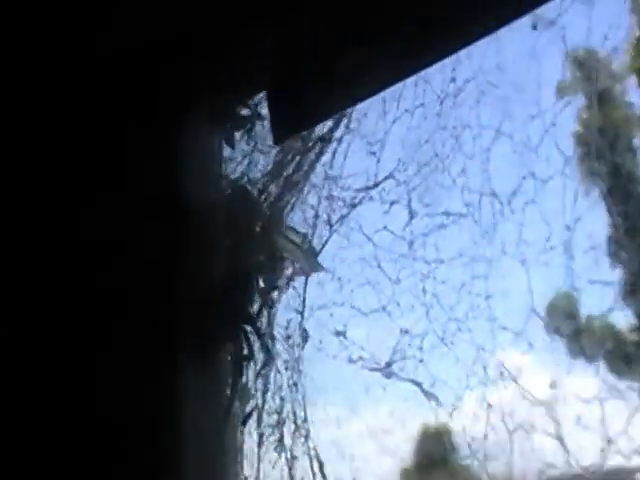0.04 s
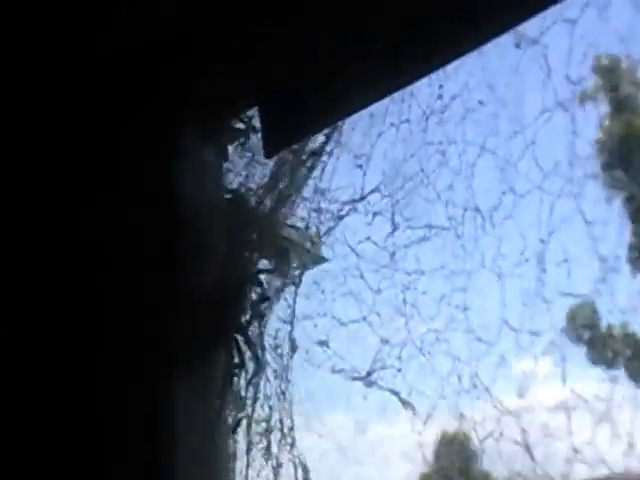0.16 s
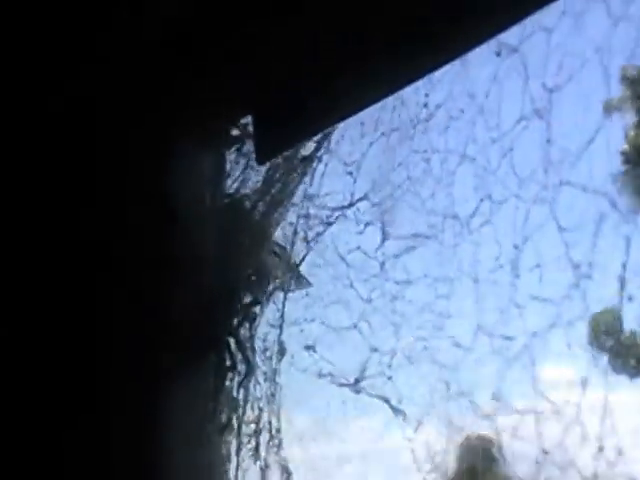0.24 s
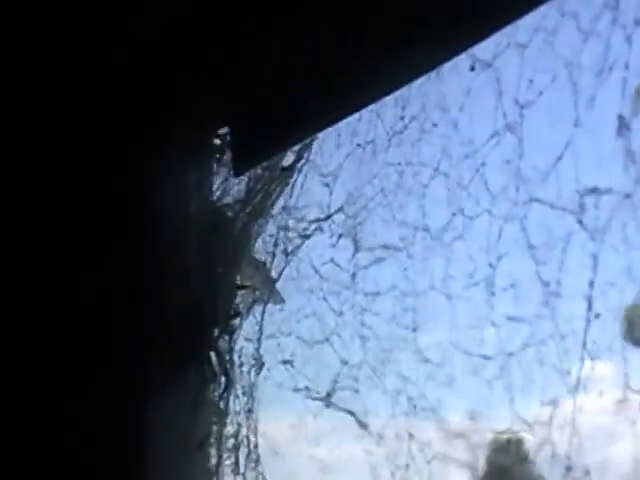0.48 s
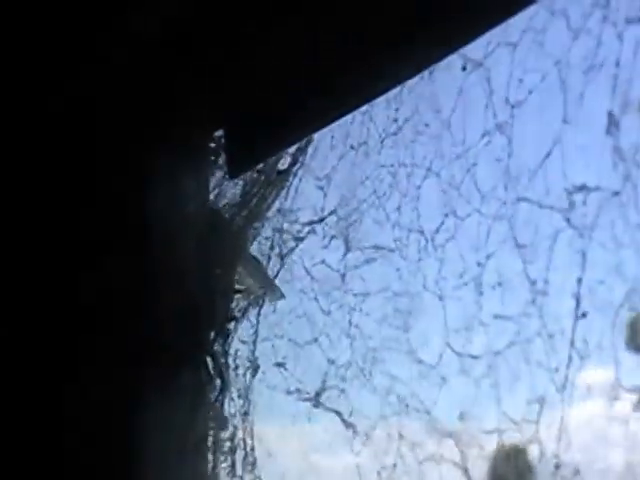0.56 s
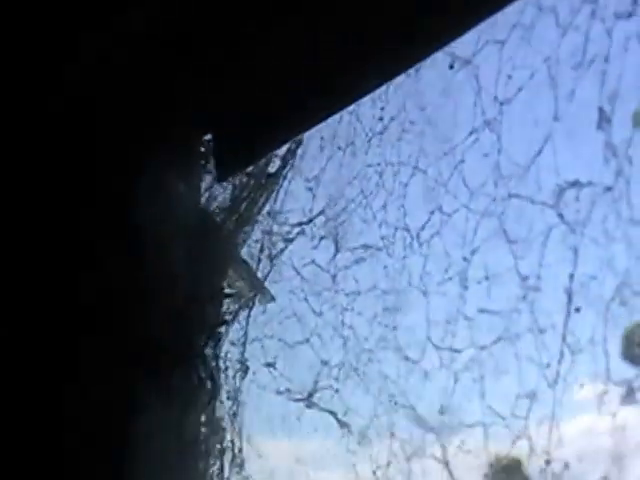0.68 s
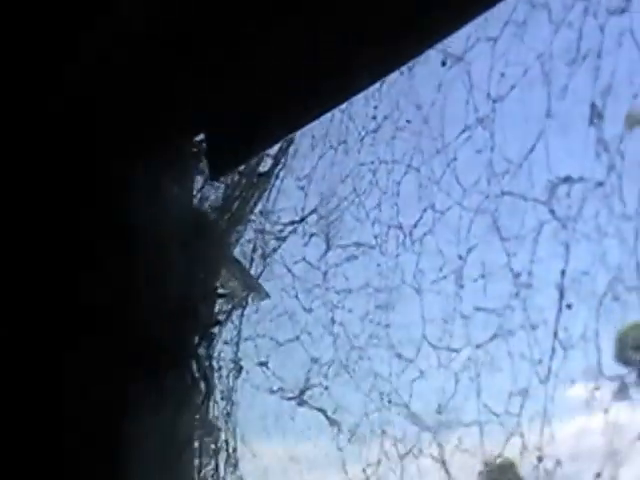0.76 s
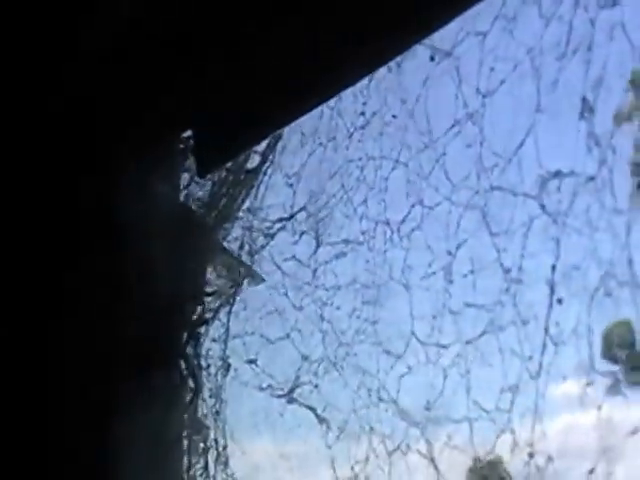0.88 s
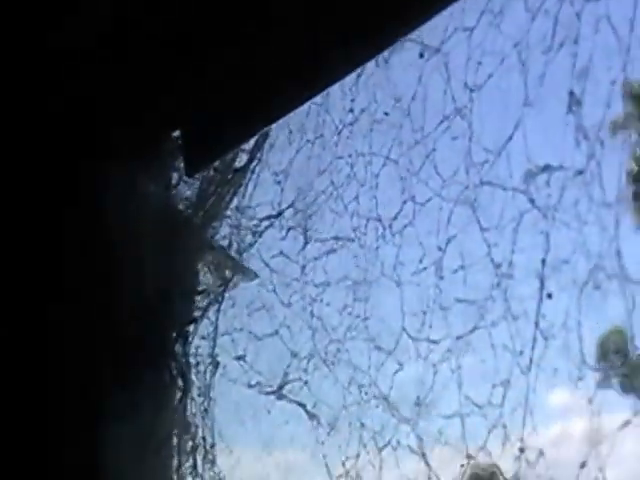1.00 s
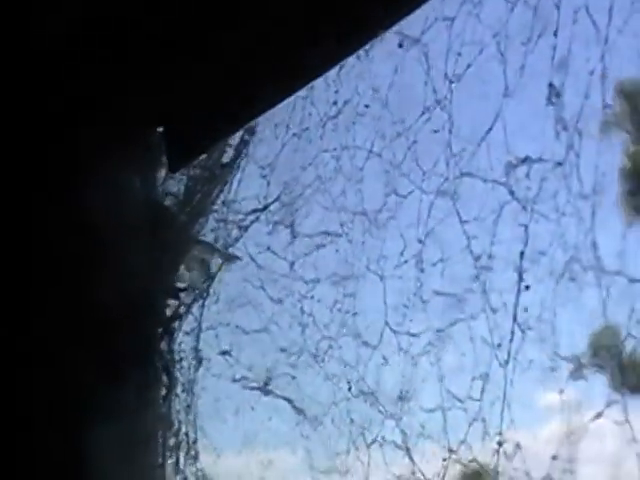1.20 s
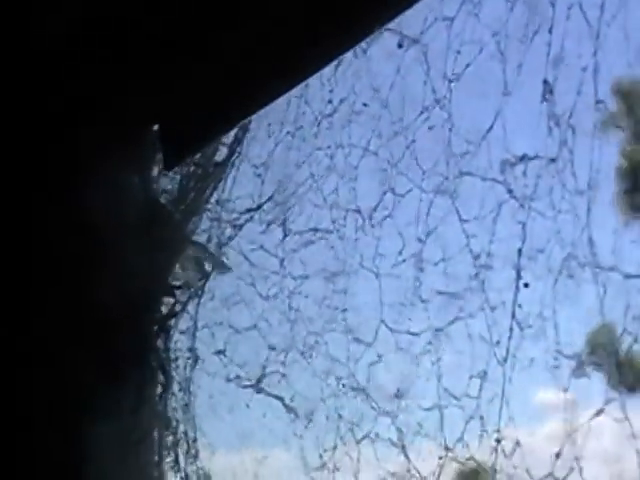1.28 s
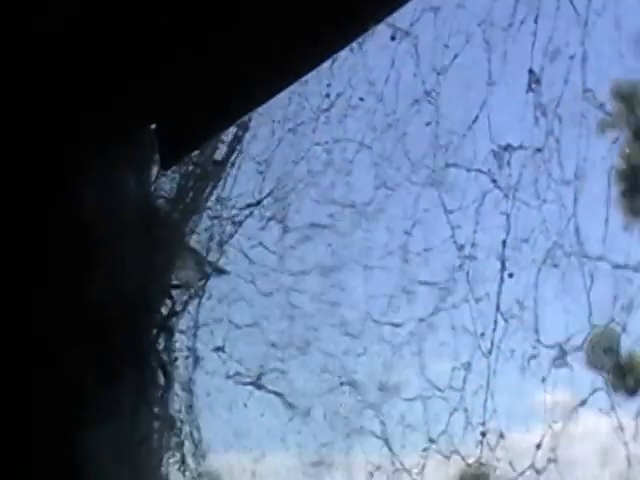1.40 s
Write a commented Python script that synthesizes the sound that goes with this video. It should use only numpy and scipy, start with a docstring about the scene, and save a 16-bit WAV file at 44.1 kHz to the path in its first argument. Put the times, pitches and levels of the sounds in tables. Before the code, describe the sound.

A hand-held camera's plastic casing gives one sharp, thumping click, then a quick cluster and a few lighter clicks, right at the microphone. Faint zoom motor ticking and hum run over low, steady outdoor noise.

```python
"""Handling a zooming camera

A hand-held camera zooms in on a spider web over a quiet outdoor background. Its casing clicks
under the fingers, hard at first, then lightly: each impulse gives a snap and excites damped modes,
heard as a plastic ring and a low thump. A finger slides briefly with friction noise, the zoom motor
ticks faintly in periodic steps, and the camera's drive hums throughout."""
import sys
import numpy as np
from scipy import signal
from scipy.fft import rfft, irfft
from scipy.io import wavfile
from scipy.ndimage import uniform_filter1d

SR = 44100
rng = np.random.default_rng(int(sys.argv[2]) if len(sys.argv) > 2 else 0)


def to_wav(sig):
    """Store sig (one row per channel, or 1-D mono) as 16-bit WAV at the path in sys.argv[1].

    Samples outside -1..1 are clipped; the rate is SR.
    """
    pcm = np.clip(np.atleast_2d(sig), -1, 1) * 32767
    pcm = np.round(pcm).astype(np.int16)
    wavfile.write(sys.argv[1], SR, pcm.T)  # frames by channels


N = 63945

# Casing clicks: start_s, thump_db, ring_db, snap_db, top_mode_boost_db
CASING_CLICKS = [(0.2469, 3.5, -14, -13.5, -6), (.2946, -5, -24.5, -20.5, 5), (.3560, -6, -26, -20, 2),
                 (0.3814, -17.5, -42, -46, 2), (.3893, -35, -35.5, -58, 5), (0.3946, -24, -33, -38, 5),
                 (0.4123, -18.5, -70, -50, 0), (0.4203, -12, -30, -35, 5), (0.4324, -16.5, -29.5, -31.5, 7),
                 (0.4635, -19, -34.5, -42.5, -18), (0.47, -19, -34.5, -51, -2),
                 (0.4985, -10.5, -24, -34.5, 2), (0.6699, -17, -34.5, -42, 3.5),
                 (0.7965, -13, -29.5, -38, 7), (0.9094, -14.5, -28, -39.5, 3.5),
                 (0.9629, -14, -29.5, -40.5, 8), (1.0359, -16, -30, -47, 6), (1.154, -28.5, -70, -63, 0),
                 (1.173, -25, -76, -60, 4)]
# Low modes of the casing: pitch_hz, level_db, t60_s
THUMP_MODES = [(199, 0.5, 0.04), (324.3, 2.5, .016), (561, -9, 0.023)]
# High modes of the casing: pitch_hz, level_db, t60_s
RING_MODES = [(842.5, -15.5, 0.05), (895.3, -15, 0.06), (1142, -17.5, 0.018), (1586, -24, 0.025),
              (1730, -11, 0.017), (2874, -2, .018), (2954, -2, 0.016), (3458, -10.5, 0.015)]
# Spectrum of the snap: frequency_hz, relative_density_db
SNAP_SPECTRUM = [(800, 1.5), (2350, -13.5), (3700, 2), (4300, -2.5), (5200, -3.5), (6100, -9.5), (6600, 1),
                 (7400, -3.5), (8200, 4), (8800, -18), (10000, -24.5), (11000, -14.5), (13000, -20),
                 (16000, -25)]


def casing_clicks(size=2048):
    """Impulse excitation: a snap with a brief rattle sets the casing's high and low modes ringing."""
    body, snaps = np.zeros((2, N))
    t = np.arange(size) / SR
    rattle_envelope = amp(-5) * (np.exp(-t / 0.00064) + amp(-25) * np.exp(-t / 0.011))
    top_hz, top_db, top_t60 = RING_MODES[-1]
    for start_s, thump_db, ring_db, snap_db, boost_db in CASING_CLICKS:
        ring = damped_modes(RING_MODES[:-1] + [(top_hz, top_db + boost_db, top_t60)])
        thump = damped_modes(THUMP_MODES, rise_s=0.011, alternate=True)
        snap = (t == 0) + rattle_envelope * rng.choice([-1., 1.], size)
        add(body, start_s, amp(ring_db) * ring + amp(thump_db) * thump)
        add(snaps, start_s, amp(snap_db) * snap)
    return body + coloured(snaps, SNAP_SPECTRUM)


def damped_modes(modes, rise_s=0.0011, alternate=False, detune=0.0042, size=4096):
    """Modal superposition: each mode of a struck body swells quickly, then decays exponentially."""
    t = np.arange(size) / SR
    hz, db, t60 = np.transpose(modes)[:, :, None]
    hz = hz * (1 + detune * rng.standard_normal(hz.shape))
    # neighbouring bending modes push the microphone in opposite directions
    sign = (-1) ** np.arange(len(modes))[:, None] if alternate else 1
    partials = sign * amp(db - 60 * t / t60) * np.sin(2 * np.pi * hz * t)
    return (1 - np.exp(-t / rise_s)) * partials.sum(0)


# Envelope of the slide: time_s, level_db
SLIDE_ENVELOPE = [(.355, -65), (0.373, -40), (.395, -44.5), (.425, -43), (.44, -58), (.455, -66)]
# Spectrum of the friction: frequency_hz, relative_density_db
SLIDE_SPECTRUM = [(80, 12.5), (200, 7), (450, 1), (700, 5), (860, -30), (1100, -18), (2300, -12.5),
                  (2900, -2.5), (3700, -17), (8300, -15), (9500, -38), (11500, -23), (15000, -31)]


def finger_slide(grain_db=1):
    """Sliding friction: fine slips of skin on plastic merge into grainy noise."""
    grains = rng.standard_normal(N) * amp(grain_db * drift(size=90))
    level_db = np.interp(np.arange(N) / SR, *np.transpose(SLIDE_ENVELOPE), left=-np.inf, right=-np.inf)
    return amp(level_db) * unit(coloured(grains, SLIDE_SPECTRUM))


# Modes rung by a motor step: pitch_hz, level_db, t60_s
STEP_MODES = [(224, -15, 0.017), (560, 3, 0.017), (820, -2.5, 0.026), (2919, 0.5, 0.019),
              (3077, -3.5, 0.016), (3230, -2, 0.0092)]


def zoom_motor(start_s=0.2137, step_s=0.02, strong_db=-46.5, weak_db=-51.5, rebound_db=-3.5):
    """Periodic impacts: steps, weak and strong in turn, tap the lens mount, each with a rebound."""
    taps = np.zeros(N)
    for k, tap_s in enumerate(np.arange(start_s, N / SR, step_s)):
        gain = amp((strong_db if k % 2 else weak_db) + 0.3 * rng.standard_normal())
        add(taps, tap_s, gain * damped_modes(STEP_MODES))
        rebound_s = tap_s + 0.002 * rng.uniform(0.882, 1.2)
        add(taps, rebound_s, gain * amp(rebound_db) * damped_modes(STEP_MODES))
    return taps


# Level difference between the microphone ports: frequency_hz, left_minus_right_db
PORT_LEVELS = [(60, 7), (200, 0), (400, 2.4), (600, -2.5), (860, -8), (1050, 11.5), (1300, 16), (1800, 0),
               (2900, -2.5), (4100, 8.5), (5000, -6.5), (6000, 9.5), (7900, -6.5), (9400, 14), (15000, -7)]
# Phase difference between the ports: frequency_hz, left_lead_rad
PORT_PHASES = [(200, -.06), (330, -.25), (450, -.9), (560, .3), (700, -2.7), (830, -.3), (1200, .6),
               (1450, 0), (2200, .9), (2900, .1), (3450, -.4), (4100, .4), (5000, -.2), (5900, -2.1),
               (7000, -2.6), (8200, -2.5), (9300, .3), (11200, 1.4), (16000, 1.1)]


def microphone_ports(vibration):
    """Structure-borne sound: casing vibration reaches the two ports with unequal level and phase."""
    hz = np.fft.rfftfreq(2 * N, 1 / SR)
    left_response = amp(read(PORT_LEVELS, hz) / 2) * np.exp(.5j * read(PORT_PHASES, hz))
    return irfft(rfft(vibration, 2 * N) * np.array([left_response, 1 / left_response]))[:, :N]


# Tones of the camera's drive: pitch_hz, rms_level_db
HUM_TONES = [(193.8, -65.5), (473.7, -64), (630, -63), (775.2, -71.5), (824, -66.5), (1223, -76)]


def drive_hum(waver=0.28, whine_hz=15625, whine_db=-90):
    """Line spectrum: the drive's tones waver in amplitude and phase under a thin, steady whine."""
    t = np.arange(N) / SR
    tones = amp(whine_db) * np.sin(2 * np.pi * whine_hz * t)
    for hz, db in HUM_TONES:
        envelope = amp(db) * (1 + waver * drift(size=3000))
        phase = 2 * np.pi * (hz * t + rng.random()) + waver * drift(size=3000)
        tones += envelope * np.sin(phase)
    return np.sqrt(2) * tones


# Spectrum of the background: frequency_hz, relative_density_db
AIR_SPECTRUM = [(25, -26), (60, -5), (110, -2), (180, -4), (260, -9), (450, -10), (600, -13), (720, -19),
                (850, -17), (1050, -25), (1200, -23), (1370, -26), (1700, -21), (2120, -26), (2330, -25),
                (2550, -29), (2850, -27), (3600, -35), (5500, -35), (8000, -37), (16000, -43)]
# Likeness of its left and right channels: frequency_hz, coherence_ratio
AIR_COHERENCE = [(60, 0.98), (550, .95), (720, 0.92), (900, 0.56), (1500, 0.78), (2300, 0.29), (2900, 0.99),
                 (4000, 0.19), (8000, 0.069), (10000, 0.38), (16000, 0.4)]


def outdoor_air(level_db=-49, flicker_db=2.38, size=1024):
    """Partial coherence: low, steady noise is nearly mono in the bass and wide in the hiss."""
    hz, hop = np.fft.rfftfreq(size, 1 / SR), size // 4
    noise = rng.standard_normal((5, N // hop + 5, len(hz)))
    left, independent = noise[0] + 1j * noise[1], noise[2] + 1j * noise[3]
    coherence = np.clip(read(AIR_COHERENCE, hz), 0, 1)
    right = coherence * left + np.sqrt(1 - coherence ** 2) * independent
    # the level flickers in small patches of time and frequency
    flicker = unit(uniform_filter1d(uniform_filter1d(noise[4], size=10, axis=0), size=12, axis=1))
    spectra = np.array([left, right]) * amp(read(AIR_SPECTRUM, hz) + flicker_db * flicker)
    _, air = signal.istft(spectra.swapaxes(1, 2), nperseg=size, noverlap=size - hop)
    return amp(level_db) * unit(air[:, :N])


def amp(db):
    """Amplitude ratio of a level in decibels."""
    return 10 ** (np.asarray(db) / 20)


def unit(x):
    """Normalisation to rms 1."""
    return x / np.sqrt(np.mean(x ** 2) + 1e-20)


def read(points, hz):
    """Interpolation on a log-frequency axis."""
    knots_hz, values = np.transpose(points)
    return np.interp(np.log(hz + 1), np.log(knots_hz + 1), values)


def add(mix, start_s, sound):
    """Superposition: a sound joins the mix at its start time."""
    part = mix[max(round(start_s * SR), 0):][:len(sound)]
    part += sound[:len(part)]


def coloured(x, spectrum, size=1024):
    """Spectral shaping by a causal filter of unit energy."""
    hz = abs(np.fft.fftfreq(size, 1 / SR))
    log_gain = np.log(amp(read(spectrum, hz)))
    minimum_phase_response = np.exp(np.conj(signal.hilbert(log_gain)))
    taps = np.fft.ifft(minimum_phase_response).real[:size // 2]
    return signal.fftconvolve(x, taps / np.linalg.norm(taps))[:len(x)]


def drift(size):
    """Smoothed noise: a random wander of rms 1."""
    return unit(uniform_filter1d(uniform_filter1d(rng.standard_normal(N), size), size))


def low_cut(x, hz):
    """Second-order high-pass filtering attenuates the deep bass."""
    return signal.sosfilt(signal.butter(2, hz, "high", fs=SR, output="sos"), x)


def scene():
    """Superposition: the casing's vibration adds to the hum and the outdoor background."""
    vibration = low_cut(casing_clicks() + finger_slide() + zoom_motor(), hz=77.5)
    return microphone_ports(vibration) + drive_hum() + outdoor_air()


def record(dry):
    """Band limiting: the microphone cuts the deep bass and the recorder the highest treble."""
    low_pass = signal.firwin(511, cutoff=15850, window=("kaiser", 9), fs=SR)
    return signal.oaconvolve(low_cut(dry, hz=53.7), low_pass[None], "same")


dry = scene()
out = record(dry)
to_wav(out)
```